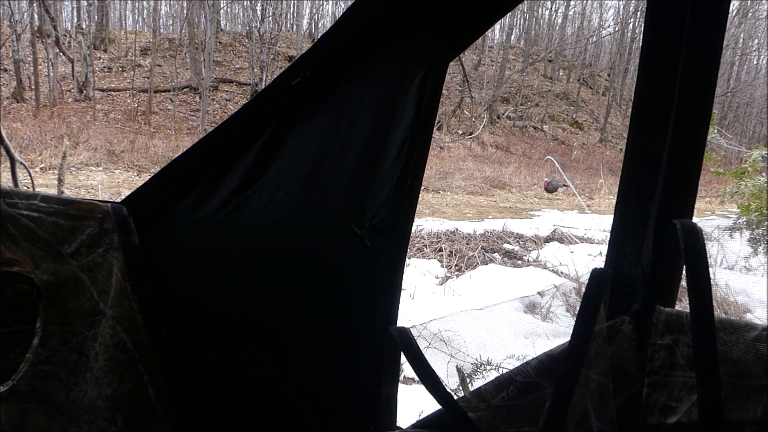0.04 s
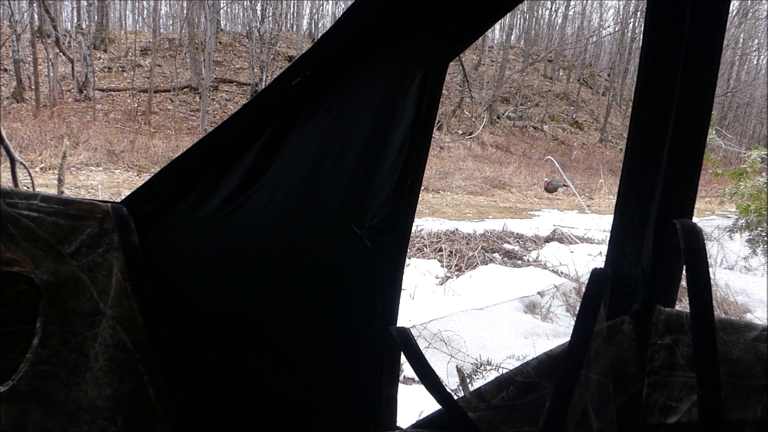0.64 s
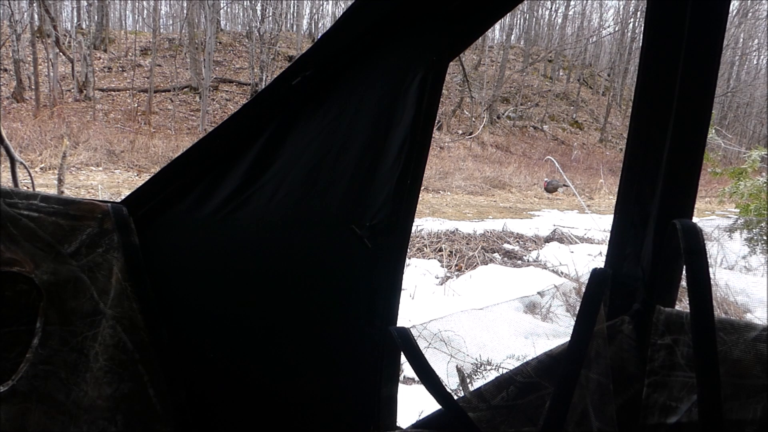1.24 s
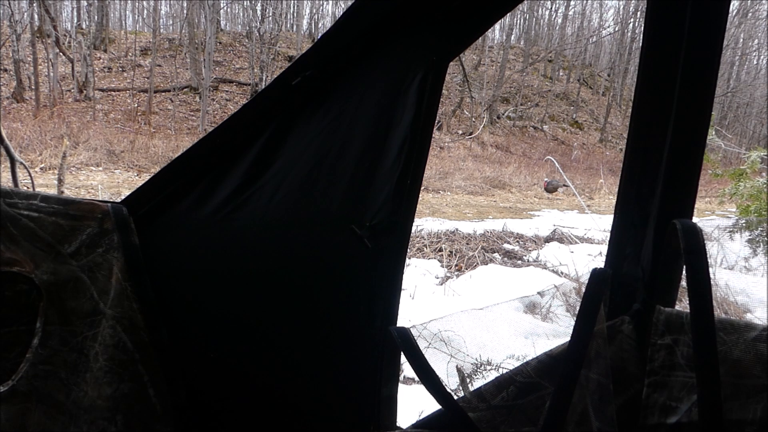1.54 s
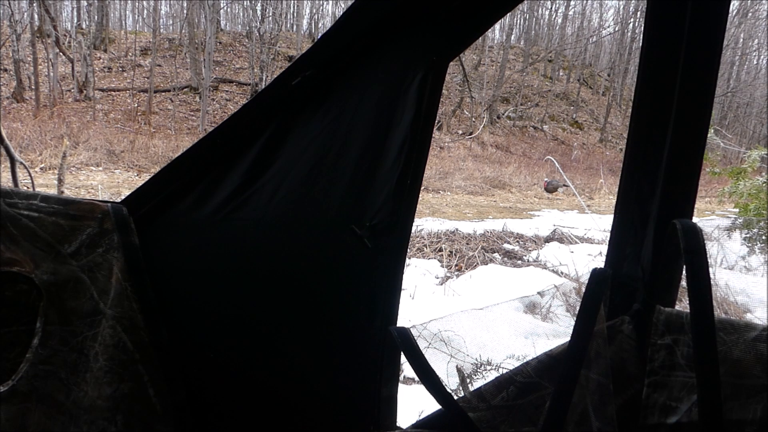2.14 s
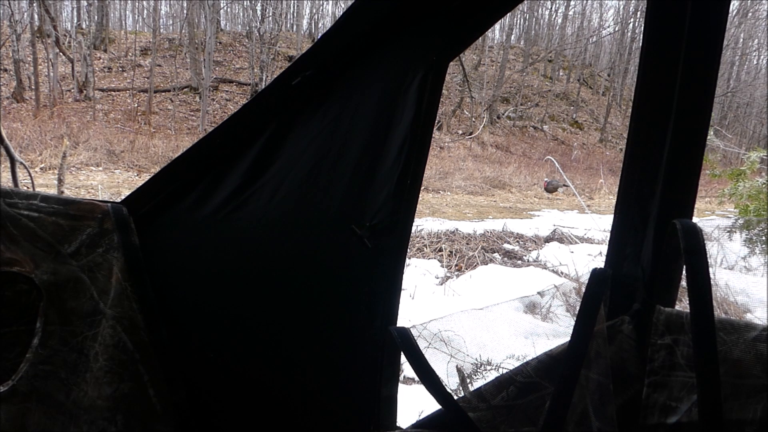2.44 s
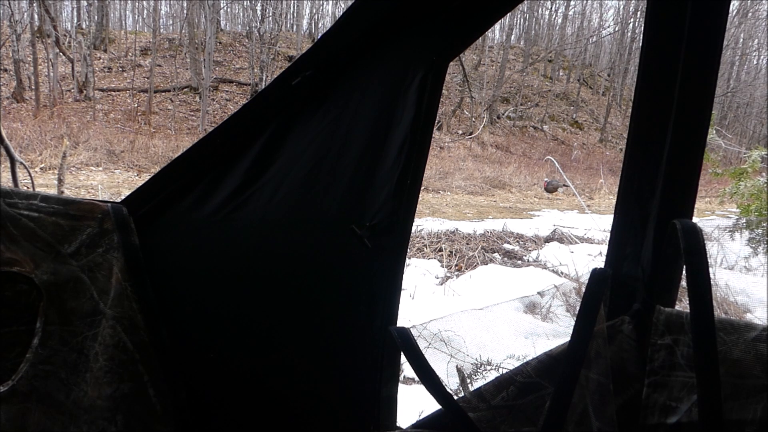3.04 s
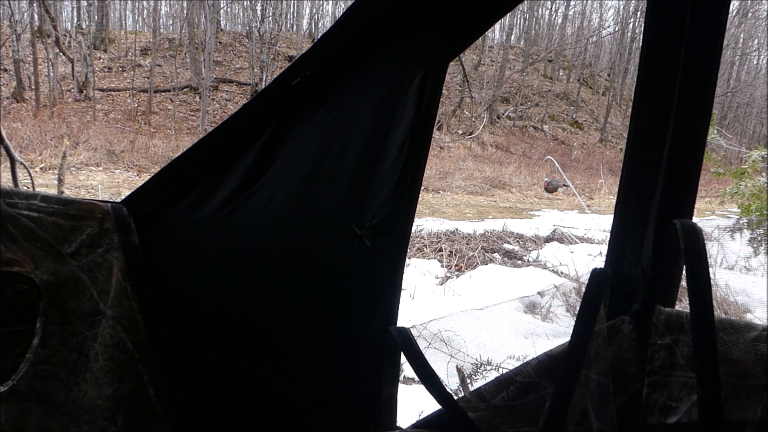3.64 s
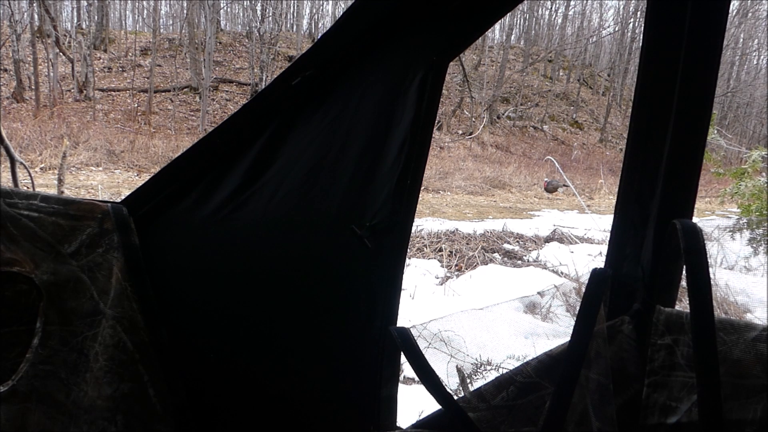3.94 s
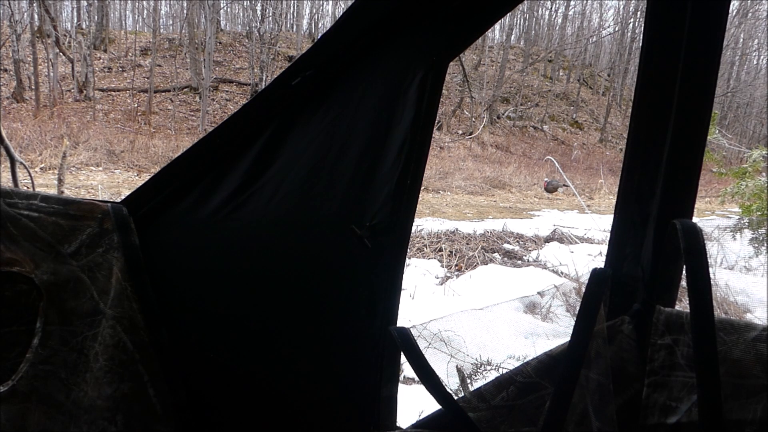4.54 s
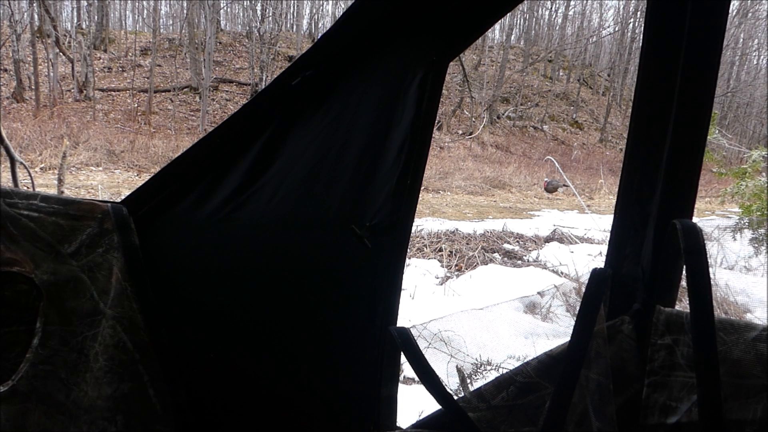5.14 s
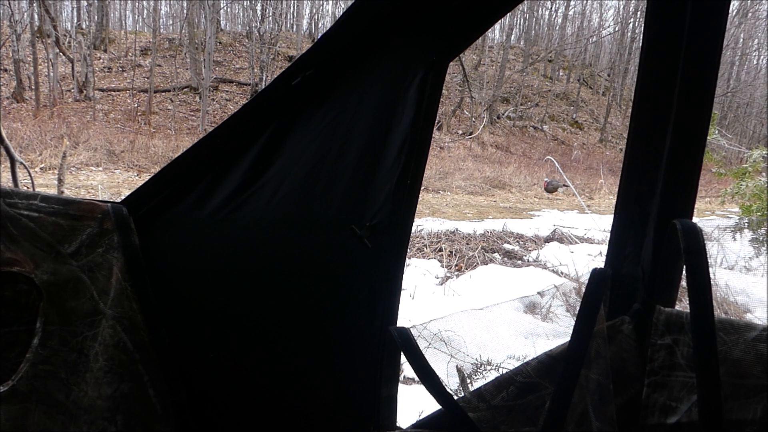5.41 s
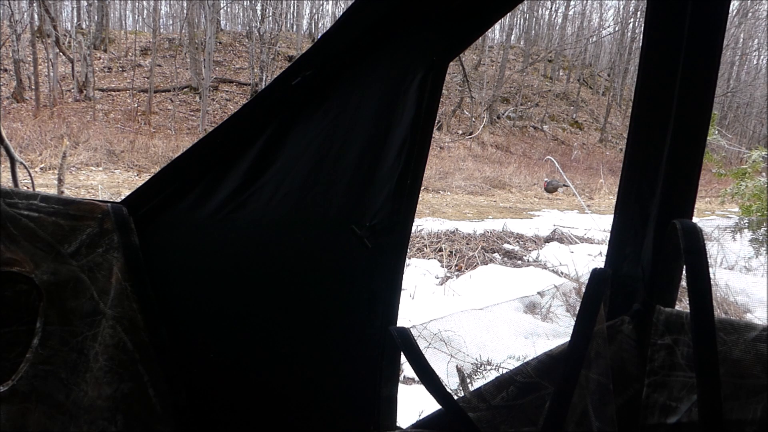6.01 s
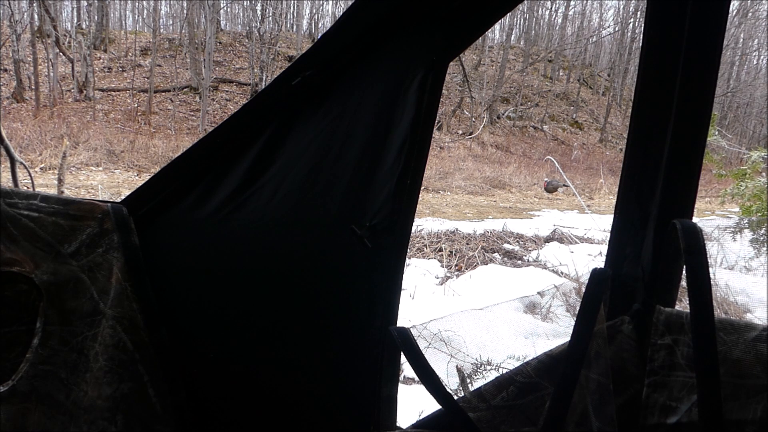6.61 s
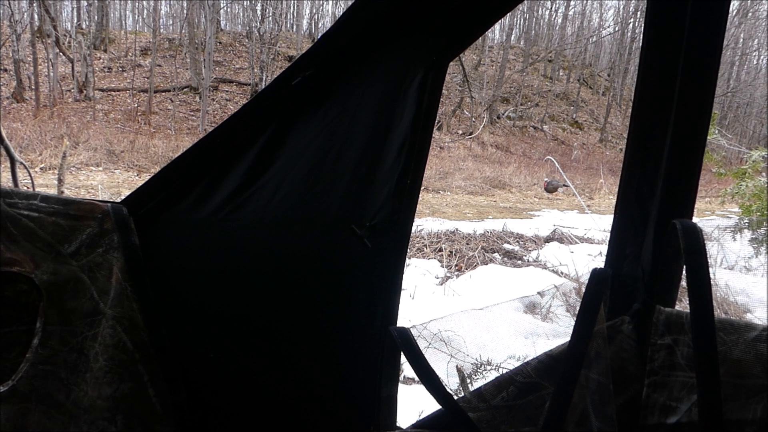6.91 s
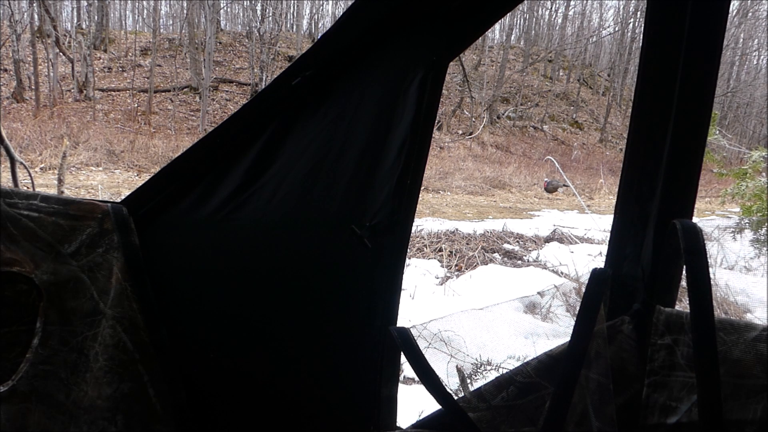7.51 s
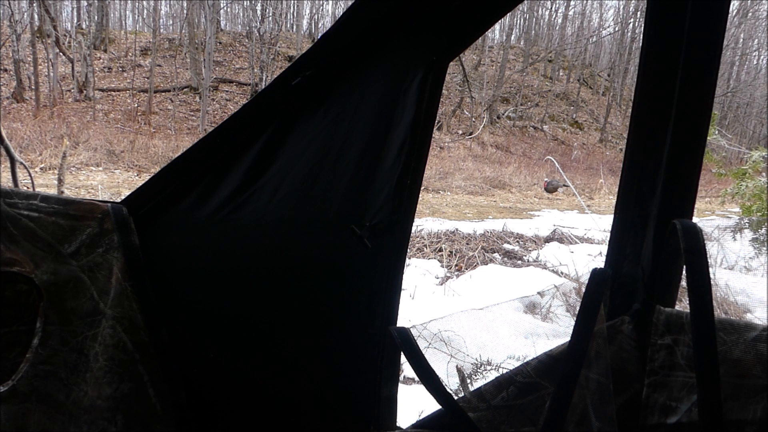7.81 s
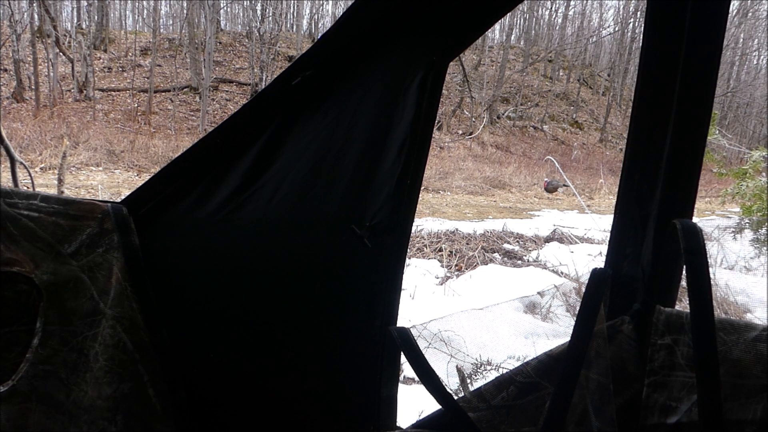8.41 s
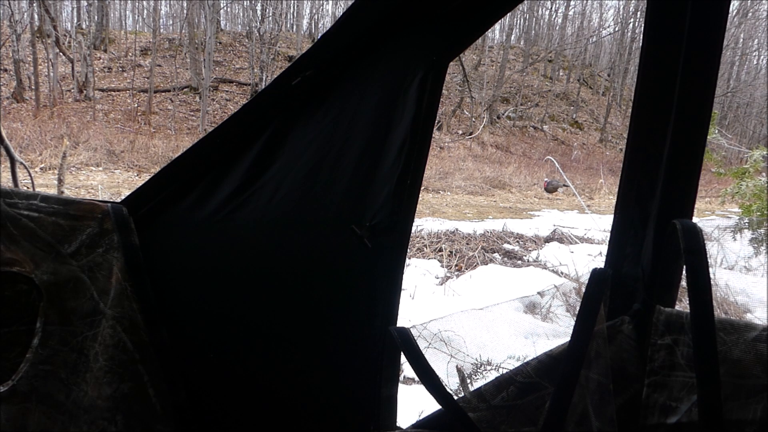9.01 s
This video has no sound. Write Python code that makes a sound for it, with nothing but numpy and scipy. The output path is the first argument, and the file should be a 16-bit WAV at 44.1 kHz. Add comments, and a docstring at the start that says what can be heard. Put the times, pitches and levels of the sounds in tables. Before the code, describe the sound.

One short cluck and seven raspy turkey-like yelps from a mouth call sound close by in quiet woods.

```python
"""Turkey mouth call from a blind

A hunter in a fabric blind at the edge of a wood plays one cluck, then seven yelps. A latex reed pulses
into the mouth and lip resonances; a second reed flutters against it for the rasp. Each yelp starts as
a thin whistle, breaks down to a raspy note and flips up again as the air stops.
Behind it: faint wind, a far engine, soft airy swells, ticks, two bird chips and microphone hiss."""
import sys
import numpy as np
from scipy import signal
from scipy.fft import rfft, irfft
from scipy.io import wavfile
from scipy.ndimage import uniform_filter1d

SR = 44100
rng = np.random.default_rng(int(sys.argv[2]) if len(sys.argv) > 2 else 0)


def pcm_store(signal):
    """Save signal as 16-bit PCM."""
    levels = np.round(np.clip(np.atleast_2d(signal), -1, 1) * 32767)
    wavfile.write(sys.argv[1], SR, levels.astype(np.int16).T)


N = 408366
TIME = np.arange(N) / SR
FREQS = np.maximum(np.fft.rfftfreq(N, 1 / SR), 1)

# Stereo noise. Each row: frequency in Hz, left-right correlation.
MIC_CORRELATION = [(50, .98), (1000, .97), (3000, .85), (8000, .78), (15000, .87)]
# Noise spectra. Each row: frequency in Hz, relative density in dB.
HISS_SPECTRUM = [(1060, -38.5), (1800, -18.5), (1880, -4), (2280, -5), (4210, -7), (6130, -8),
                 (14600, -1.5), (16000, -5)]
TREE_SPECTRUM = [(24, -46.5), (40, 0), (113, 0), (214, -4.5), (250, -2), (283, -6), (314, -1.5), (637, -3),
                 (916, -5), (1860, -22), (2500, -36), (3250, -62.5), (5500, -120)]
SWELL_SPECTRUM = [(300, -7.5), (900, -5), (2200, 0), (4000, -3.5), (7000, -12), (14000, -22.5)]
# Wind in the trees and on the microphone. Each row: time in seconds, level in dB before trim.
RUSH_LEVELS = [(0.0, -67), (0.82, -65.5), (1.99, -62), (4.26, -64), (6.99, -62), (8.79, -64.5), (9.26, -63)]
BUFFET_LEVELS = [(0.0, -59), (0.07, -59), (2.4, -68.5), (2.68, -58), (4.1, -50), (4.51, -63), (4.56, -56),
                 (9.26, -67)]
# Far engine. Each row: time in seconds, firing rate in Hz, level in dB.
ENGINE_CURVE = [(0, 167, -63.5), (.62, 170.6, -65), (.82, 131, -77), (2.3, 143.5, -71.5),
                (3.2, 154.1, -75.5), (4.7, 168.6, -68), (5.45, 170, -67.5), (5.65, 147.3, -70),
                (6.2, 128.7, -89), (9.2, 119.9, -73)]
# Soft swells of airy noise. Each row: peak time in seconds, level in dB, half length in seconds.
NOISE_SWELLS = [(1.6, -64, 0.4), (2.25, -62.5, 0.3), (2.9, -66, 0.53), (3.571, -63.5, 0.23),
                (4.138, -65, 0.063), (4.65, -73.5, 0.31), (4.994, -76, .05), (7.243, -78, .04),
                (7.721, -80, 0.079), (9.25, -70, 0.052)]
# Ticks and scuffs. Each row: peak time in seconds, level in dB, centre in Hz, rise and decay in seconds.
SMALL_TICKS = [(0.233, -61.5, 3240, 0.0054), (0.714, -60.5, 3480, 0.0037), (1.14, -59, 255, 0.031),
               (4.698, -66.5, 6500, 0.025), (4.879, -62.5, 6700, 0.0064), (4.965, -63.5, 6600, .008),
               (4.98, -66, 2200, .007), (5.237, -66, 3150, 0.0097), (7.476, -54.5, 482, 0.0043),
               (7.755, -68, 2800, .006), (8.0, -74, 2502, .008), (8.49, -70, 2193, 0.0044),
               (8.518, -71, 2200, 0.011)]
# Small bird. Each row: peak time in seconds, level in dB, pitch and spread in Hz, half length in seconds.
BIRD_CHIPS = [(7.687, -69, 4330, 6, .02), (8.001, -67.5, 4850, 200, .008)]
# Nearby surfaces. Each row: delay in seconds, gain.
BLIND_REFLECTIONS = [(.0043, .13), (.0105, .12), (.0153, .05), (.026, .03)]
# Colour of the echo from the trees. Each row: frequency in Hz, gain in dB.
WOOD_SPECTRUM = [(500, -12), (1200, -4), (1550, 6.5), (2000, -2.5), (4000, -15), (10000, -25.5)]
# Lips opening for the cluck. Each row: start in seconds, drive level in dB, decay in seconds.
LIP_POPS = [(.8905, -12, .001), (.8938, -7, .0014), (.897, -24, .013)]
# Resonances of lip pop, mouth cavity and lip gap. Each row: centre and width in Hz, relative gain in dB.
POP_MODES = [(1150, 180, 1), (1450, 300, 1), (1900, 400, 2), (3150, 400, 0), (4200, 1200, -19),
             (6900, 1600, -25)]
MOUTH_MODES = [(838, 410, -13), (1046, 85.5, -18), (1487, 340, -9), (1568.8, 200, -3.5), (1747.6, 231, 8),
               (2310, 87, -17.5)]
LIP_MODES = [(3192, 160, -3.5), (3240, 250, -7), (4014, 113, -7), (4830, 110, -22.5), (5510, 74, -35),
             (6540, 770, -37.5), (7616, 320, -43)]
# Yelps. Each row: break time and length in seconds, mid-note pitch in Hz; mid-note level, swell, crack
# and overtone share in dB; base rasp from 0 to 1, whistle and flip times in seconds, squeak level in dB.
YELP_NOTES = [(1.102, 0.16, 776, -25, 6, -0.5, -5, 0.38, .009, 0.0077, -40),
              (1.559, 0.12, 790.6, -22, 3, -1, -3, 0.52, .012, 0.0085, -38),
              (1.982, 0.1, 802.8, -21.5, 2.5, 4, -3, .42, .012, .006, -37.5),
              (2.418, 0.089, 779, -23, -6, 2.5, -3.5, 0.47, .032, .010, -47.5),
              (2.803, .138, 769.2, -23, -3, 4, -4.5, 0.5, 0.025, .003, -43.5),
              (3.222, .104, 772.6, -22, -6.5, 1.5, -4, 0.75, 0.02, .005, -44),
              (3.634, 0.11, 770.5, -21, -4.5, -1, -4.5, .8, .014, 0.0083, -42.5)]
# Tongue pressing or easing. Each row: time in seconds, change of pitch in Hz, overtones and level in dB.
TONGUE_PRESSES = [(1.190, -3.5, 0, 3.5), (1.252, 8.5, 0.5, -5.5), (1.660, 4, -2.5, -4.5),
                  (2.060, 11.5, 5, -5), (2.443, 26, 2.5, 0.5), (2.465, -22.5, -2, 1), (2.489, 25, 3.5, -2),
                  (2.868, -16, -5.5, 2.5), (2.897, 28, 5.5, 2), (3.283, 32, 7, -1.5),
                  (3.722, 21.5, 2, -6.5)]

WHISTLE_HZ, WHISTLE_DB, WHISTLE_RISE_DB = 1095, -30, 16.5
BREAK_LEAD_S, BREAK_GLIDE_S = .0036, .0044
ATTACK_LEAD_S, ATTACK_S, CRACK_S = .0022, .0008, .004
SAG_HZ_PER_S, BOW_HZ = 83, 13   # the note sinks as the tongue relaxes; its ends bow up
PRESS_WIDTH_S, CLEAN_DB_PER_HZ = .010, .3   # pressing the pitch up cuts the rasp
FLIP_HZ, RELEASE_S = 1005, .0042
WHISTLE_DULL_DB, FLIP_DULL_DB, TIGHT_RASP_LOSS = 20, 7, .6   # a tight reed loses overtones and rasp
CLUCK_S = .8945


def from_db(db):
    """Decibels to gain."""
    return 10 ** (np.asarray(db) / 20)


def unit_rms(x):
    """Scale to rms 1."""
    return x / np.sqrt(np.mean(x ** 2) + 1e-20)


def step(t, width_s):
    """Smooth rise from 0 to 1 around t = 0."""
    return .5 + .5 * np.tanh(t / (2 * width_s))


def bump(t, width_s):
    """Bell of height 1 around t = 0."""
    return np.exp(-(t / width_s) ** 2 / 2)


def over_time(rows):
    """Each value column, interpolated over time."""
    times_s, *columns = np.transpose(rows)
    return [np.interp(TIME, times_s, column) for column in columns]


def over_freq(rows):
    """Values interpolated over log frequency."""
    hz, values = np.transpose(rows)
    return np.interp(np.log(FREQS), np.log(hz), values)


def coloured(x, spectrum):
    """Minimum-phase filter with the given spectrum."""
    cepstrum = irfft(np.log(from_db(over_freq(spectrum))), N)
    cepstrum[1:N // 2] *= 2
    cepstrum[N // 2 + 1:] = 0
    return irfft(rfft(x) * np.exp(rfft(cepstrum)), N)


def resonate(x, modes):
    """Parallel fourth-order resonators."""
    out = 0
    for hz, width_hz, db in modes:
        r = np.exp(-np.pi * width_hz / SR)
        gain = (1 - r * r) / 2
        section = [gain, 0, -gain, 1, -2 * r * np.cos(2 * np.pi * hz / SR), r * r]
        out = out + from_db(db) * signal.sosfilt([section, section], x)
    return out


def band_noise(centre_hz, width_hz):
    """Noise around one frequency, rms 1."""
    white = rfft(rng.standard_normal(N))
    return unit_rms(irfft(white / (1 + ((FREQS - centre_hz) / width_hz) ** 2), N))


def stereo_noise(spectrum):
    """Coloured noise on two closely spaced microphones, rms 1."""
    mid, side = rfft(rng.standard_normal((2, N)))
    correlation = np.clip(over_freq(MIC_CORRELATION), 0, 1)
    pair = np.sqrt(1 + correlation) * mid + np.sqrt(1 - correlation) * side * [[1], [-1]]
    return unit_rms(irfft(pair * from_db(over_freq(spectrum)), N))


def wind(rush_trim_db=1, buffet_trim_db=4):
    """Soft rush in the trees, slow pressure swells on the microphone."""
    rush = from_db(over_time(RUSH_LEVELS)[0] + rush_trim_db) * stereo_noise(TREE_SPECTRUM)
    buffet = from_db(over_time(BUFFET_LEVELS)[0] + buffet_trim_db) * band_noise(6, width_hz=6)
    return rush + buffet


def engine(second_order_db=-13, waver=.009, swing_db=1.5):
    """Far engine: only the two lowest orders carry through the wood."""
    firing_hz, level_db = over_time(ENGINE_CURVE)
    phase = 2 * np.pi * np.cumsum(firing_hz * (1 + waver * band_noise(0, width_hz=3.847))) / SR
    gain = np.sqrt(2) * from_db(level_db + swing_db * band_noise(0, width_hz=4))
    return gain * (np.sin(phase) + from_db(second_order_db) * np.sin(2 * phase))


def airy_swells(floor_db=-80.5, grain_db=3):
    """Soft grainy swells of airy noise, strongest around the yelps."""
    swells = sum(from_db(db) * bump(TIME - s, width_s) for s, db, width_s in NOISE_SWELLS)
    grain = from_db(grain_db * band_noise(0, width_hz=26))
    return (from_db(floor_db) + swells) * grain * stereo_noise(SWELL_SPECTRUM)


def ticks(width_ratio=.39):
    """Small ticks and scuffs: short bursts of band noise."""
    return sum(from_db(db) * np.exp(-np.abs(TIME - s) / decay_s) * band_noise(hz, width_ratio * hz)
               for s, db, hz, decay_s in SMALL_TICKS)


def bird():
    """Two short chips, one pure and one rough."""
    return sum(from_db(db) * bump(TIME - s, width_s) * band_noise(hz, spread_hz)
               for s, db, hz, spread_hz, width_s in BIRD_CHIPS)


def echo(x, t60_s, onset_s=.0083):
    """Dense decaying tail, slightly different on each side."""
    t = TIME[:SR]
    tails = rng.standard_normal((3, SR)) * from_db(-60 * t / t60_s) * (1 - np.exp(-t / onset_s))
    pair = tails[0] + .3 * tails[1:]
    return signal.fftconvolve(x[None], unit_rms(pair) / np.sqrt(SR), axes=1)[:, :N]


def surroundings(call, blind_db=-22, wood_db=-47):
    """Direct call, close reflections, the blind's short ring and a faint return from the trees."""
    near = sum(gain * np.interp(TIME - delay_s, TIME, call) for delay_s, gain in BLIND_REFLECTIONS)
    blind = from_db(blind_db) * echo(call, t60_s=.13)
    wood = from_db(wood_db) * echo(coloured(call, WOOD_SPECTRUM), t60_s=1.7)
    return call + near + blind + wood


def lip_smack():
    """Two quick pops of air and a short tail as the lips part."""
    envelope = sum(from_db(db) * (TIME >= s) * np.exp(-np.abs(TIME - s) / decay_s)
                   for s, db, decay_s in LIP_POPS)
    return resonate(envelope * rng.standard_normal(N), POP_MODES)


def nearest_yelp():
    """Columns of the closest yelp at each sample."""
    rows = np.array(YELP_NOTES)
    mid_gaps_s = (rows[1:, 0] + rows[:-1, 0] + rows[:-1, 1]) / 2
    return rows[np.searchsorted(mid_gaps_s, TIME)].T


def whistle_swell(t, whistle_s):
    """Envelope of the thin tone, growing up to the break at t = 0."""
    return from_db(WHISTLE_RISE_DB * np.minimum(t, 0) / whistle_s) * step(t + whistle_s, RELEASE_S)


def whistles(break_hz=995, opening_db=-33, squeak_hz=945, rise_hz_per_s=4900, waver=.012):
    """The reed's high register, almost a sine: sinks into each break, squeaks up in each flip."""
    break_s, length_s, *_, whistle_s, _, squeak_db = nearest_yelp()
    t = TIME - break_s
    opening_hz = break_hz + (WHISTLE_HZ - break_hz) * step(-t - 2 * BREAK_LEAD_S, BREAK_GLIDE_S)
    closing_hz = squeak_hz + rise_hz_per_s * (t - length_s)
    pitch_hz = np.where(t < length_s / 2, opening_hz, closing_hz)
    phase = 2 * np.pi * np.cumsum(pitch_hz * (1 + waver * band_noise(0, width_hz=180))) / SR
    opening = from_db(opening_db) * whistle_swell(t, whistle_s) * step(-t, ATTACK_S)
    closing = from_db(squeak_db) * bump(t - length_s, width_s=.006)
    return np.sqrt(2) * (opening + closing) * np.sin(phase)


def cluck(pitch_hz=950, puff_db=-18.5, trace_db=-54, trace_s=.012, overtones_db=-15, rasp=.9):
    """Reed controls for one short puff and its dying, raspy trace."""
    t = TIME - CLUCK_S
    puff = from_db(puff_db) * bump(t, width_s=.0011)
    trace = from_db(trace_db) * (t > 0) * np.exp(-np.abs(t) / trace_s)
    return np.broadcast_arrays(pitch_hz, puff + trace, overtones_db, rasp)


def yelps(rasp_swing_db=2.5):
    """Reed controls for each yelp: whistle, break, sagging raspy note, upward flip."""
    break_s, length_s, hz, db, swell_db, crack_db, bright_db, rasp, whistle_s, flip_s, _ = nearest_yelp()
    t = TIME - break_s
    from_middle_s = np.clip(t, 0, length_s) - length_s / 2
    position = from_middle_s / length_s
    press_hz, press_bright_db, press_db = sum(np.outer(changes, bump(TIME - s, PRESS_WIDTH_S))
                                              for s, *changes in TONGUE_PRESSES)

    unbroken = step(-t - BREAK_LEAD_S, BREAK_GLIDE_S)
    flipped = step(t - length_s, flip_s)
    held_hz = hz - SAG_HZ_PER_S * from_middle_s + BOW_HZ * (2 * position) ** 2 + press_hz
    pitch_hz = held_hz + (WHISTLE_HZ - held_hz) * unbroken + (FLIP_HZ - held_hz) * flipped

    sounding = step(t + ATTACK_LEAD_S, ATTACK_S)
    whistle = from_db(WHISTLE_DB) * whistle_swell(t, whistle_s)
    note = from_db(db + swell_db * position + crack_db * bump(t, CRACK_S) + press_db)
    envelope = (1 - sounding) * whistle + sounding * note * step(length_s - t, RELEASE_S)

    overtones_db = bright_db + press_bright_db - WHISTLE_DULL_DB * unbroken - FLIP_DULL_DB * flipped
    rasp_change_db = rasp_swing_db * band_noise(0, width_hz=40) - CLEAN_DB_PER_HZ * press_hz
    rasp = rasp * (1 - TIGHT_RASP_LOSS * (unbroken + flipped)) * from_db(rasp_change_db)
    return pitch_hz, envelope, overtones_db, np.clip(rasp, 0, 1)


def reed(pitch_hz, rasp, flutter_hz=325, flutter_depth=.38, flutter_rad=.17, jitter=.013, air_db=-21):
    """A latex reed pulses; a looser second reed flutters against it and makes the rasp."""
    flutter = rasp * band_noise(flutter_hz, width_hz=70)
    wobble = 1 + jitter * (.5 + rasp) * band_noise(68, width_hz=51)
    phase = 2 * np.pi * np.cumsum(pitch_hz * wobble) / SR + flutter_rad * flutter
    # stretched tight, the reed does not close: almost a sine
    falloff = from_db(-27 * np.clip((pitch_hz - 965) / 95, 0, 1))
    pulses = sum(falloff ** k * np.cos((k + 1) * phase) for k in range(11))
    # air hisses through the gap once a cycle
    air = from_db(air_db) * rasp * 2 * (1 + np.cos(phase)) * band_noise(0, width_hz=4200)
    return pulses * (1 + flutter_depth * flutter) + air


def blown(source, modes, target_rms):
    """Resonances driven toward a target rms; they swell and ring out freely."""
    power = uniform_filter1d(resonate(source, modes) ** 2, size=400)
    drive = (target_rms + 1e-12) / np.sqrt(np.maximum(power, 0) + 1e-9)
    return resonate(source * drive, modes)


def mouth_call(mouth_shake_db=1.7, lip_shake_db=2.8):
    """The reed drives the mouth cavity and the lip gap through the cluck and the yelps."""
    in_cluck = TIME < (CLUCK_S + YELP_NOTES[0][0]) / 2
    pitch_hz, envelope, overtones_db, rasp = np.where(in_cluck, cluck(), yelps())
    source = reed(pitch_hz, rasp)
    # lip opening splits the power between low and high resonances; both shake with the reed
    lip_share = np.clip(from_db(overtones_db) ** 2, 0, .7)
    mouth_shake = from_db(mouth_shake_db * rasp * band_noise(60, width_hz=80))
    lip_shake = from_db(lip_shake_db * rasp * band_noise(60, width_hz=80))
    mouth = blown(source, MOUTH_MODES, np.sqrt(1 - lip_share) * envelope * mouth_shake)
    lips = blown(source, LIP_MODES, np.sqrt(lip_share) * envelope * lip_shake)
    return mouth + lips


def scene():
    """The call, close and central, over the quiet wood."""
    call = mouth_call() + whistles() + lip_smack()
    return surroundings(call) + engine() + wind() + airy_swells() + ticks() + bird()


def record(dry, hiss_db=-67, cutoff_hz=15900):
    """Microphone hiss, then a steep low-pass."""
    noisy = dry + from_db(hiss_db) * stereo_noise(HISS_SPECTRUM)
    return signal.sosfilt(signal.ellip(12, .1, 80, cutoff_hz, fs=SR, output="sos"), noisy)


dry = scene()
out = record(dry)
pcm_store(out)
```